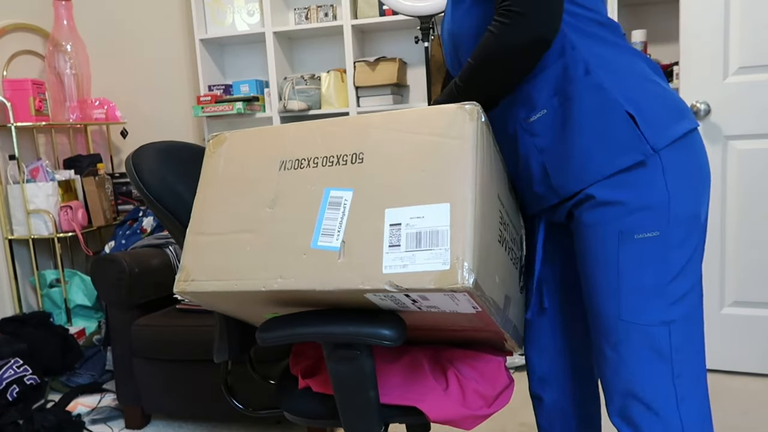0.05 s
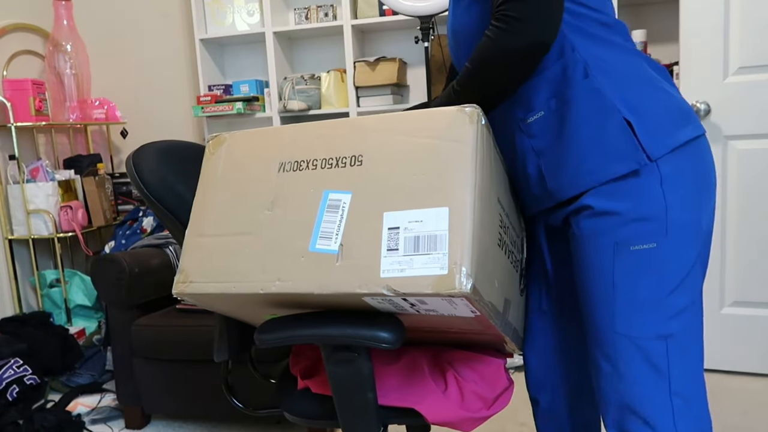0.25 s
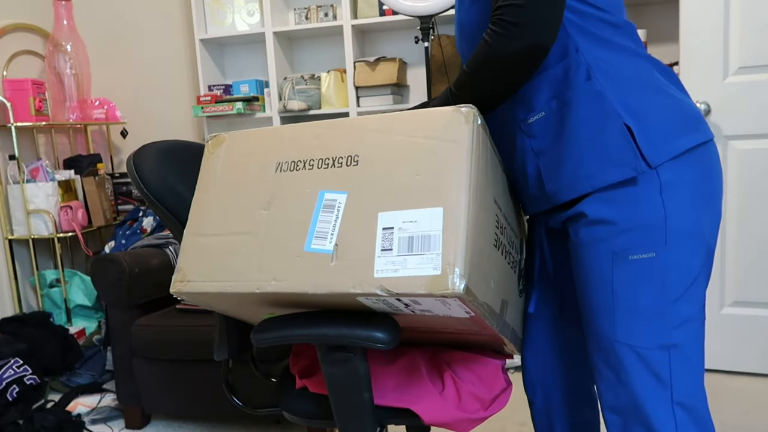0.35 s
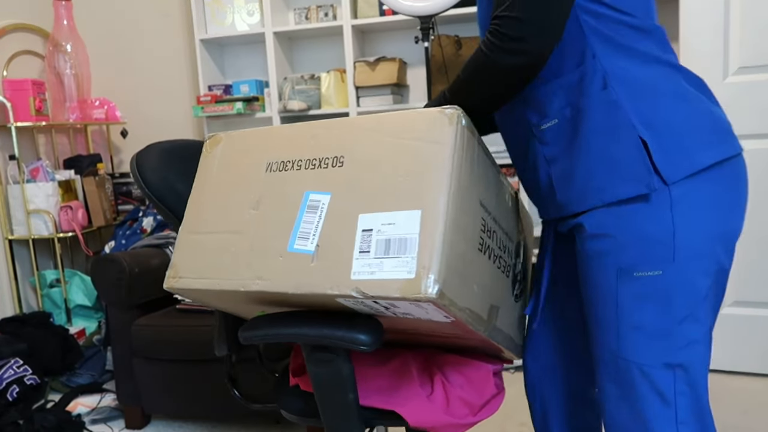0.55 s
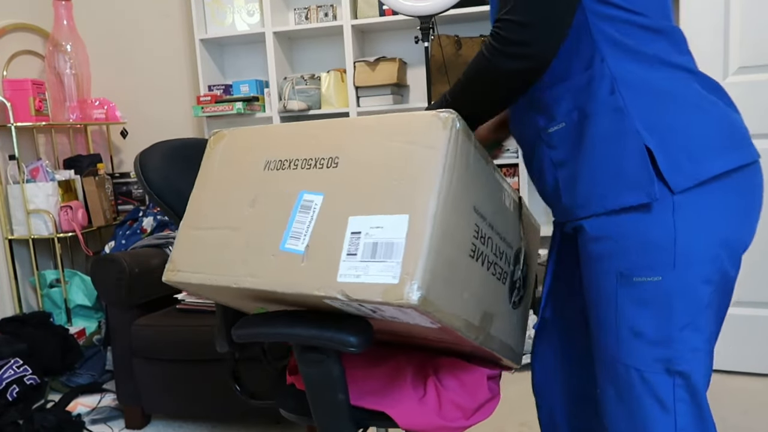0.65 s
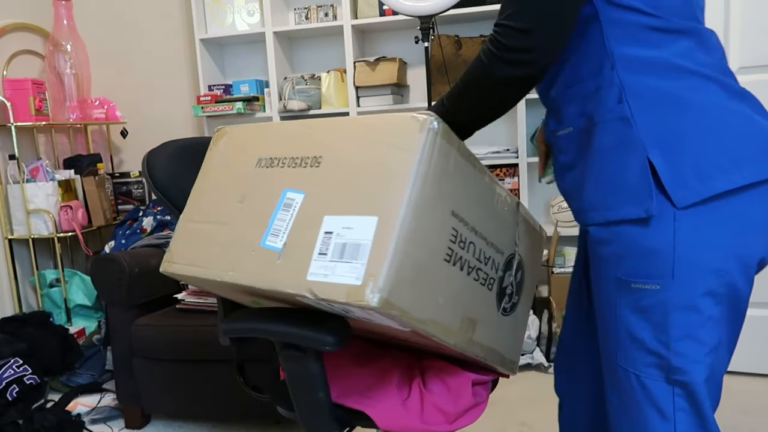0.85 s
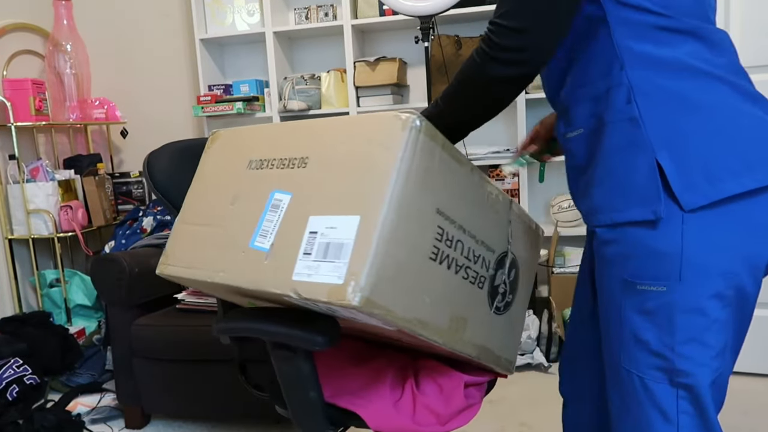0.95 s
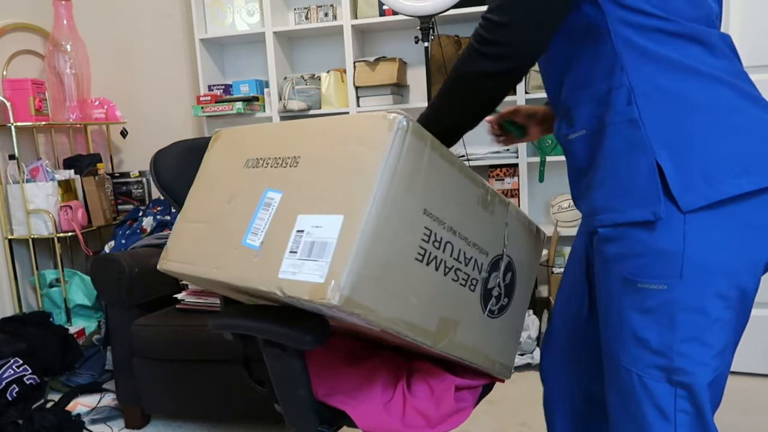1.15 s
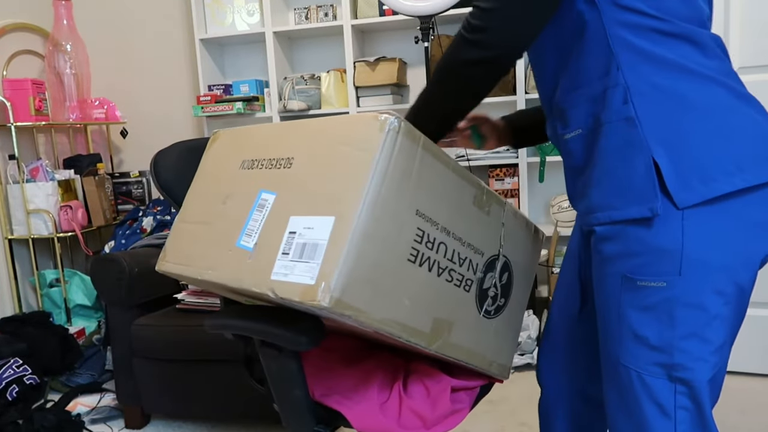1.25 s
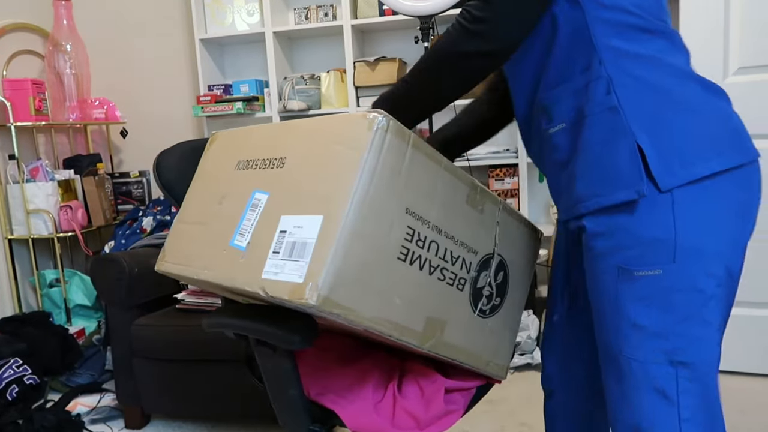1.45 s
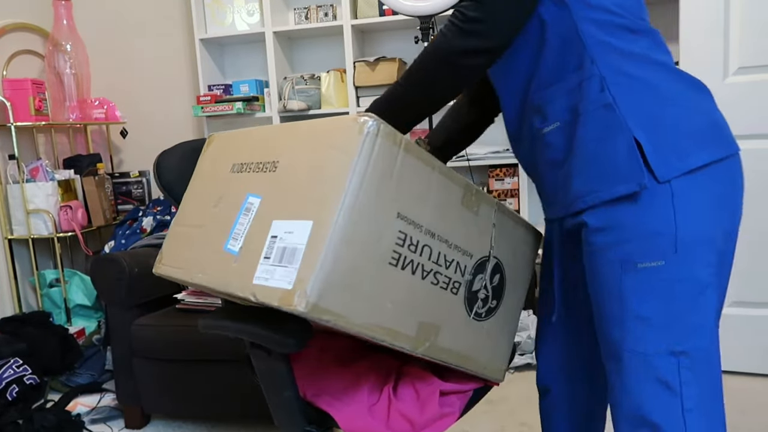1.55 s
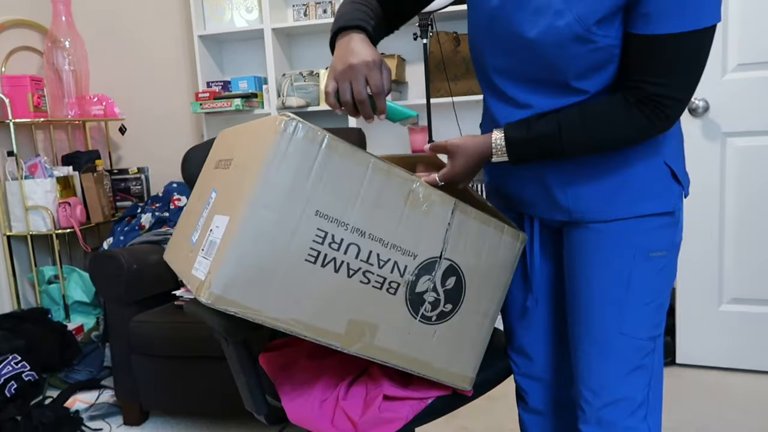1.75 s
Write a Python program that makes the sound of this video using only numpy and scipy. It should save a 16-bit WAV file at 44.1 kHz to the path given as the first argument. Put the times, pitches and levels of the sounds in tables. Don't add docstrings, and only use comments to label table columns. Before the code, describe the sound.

A large hollow cardboard box is handled on a chair, close, in a small room. Faint rubbing opens, then a sharp slap with rattle at 0.23 s and quick knocks near 0.35-0.4. A rough scraping drag with low groans and thuds peaks around 0.65-0.85, fading by 1.0. Quiet shifting and faint brushing follow; after a thud near 1.57 and a brief dip at 1.62, light knocks and ticks end it.

```python
import sys
import numpy as np
from scipy import signal
from scipy.fft import rfft, irfft
from scipy.io import wavfile
from scipy.ndimage import uniform_filter1d

SR = 44100
rng = np.random.default_rng(int(sys.argv[2]) if len(sys.argv) > 2 else 0)


def to_wav(s):
    ch = np.atleast_2d(s).T
    pcm = np.round(np.clip(ch, -1, 1) * 32767)
    wavfile.write(sys.argv[1], SR, pcm.astype(np.int16))


def ratio_of_db(decibels):
    return 10 ** (np.asarray(decibels, float) / 20)


N = 79380
T = np.arange(N) / SR
SLAP_S = 0.2253


def rms_one(x):
    return x / np.sqrt(np.mean(x ** 2) + 1e-20)


def at_hz(points, hz):
    table_hz, table_db = np.array(points)[:, 0], np.array(points)[:, 1]
    return np.interp(np.log(hz), np.log(table_hz), table_db)


def coloured(x, points, turn=1):
    hz = np.maximum(np.fft.rfftfreq(N, 1 / SR), 1)
    return irfft(rfft(x) * turn * ratio_of_db(at_hz(points, hz)), N)


def butter(x, order, hz, kind="low"):
    return signal.sosfilt(signal.butter(order, hz, kind, fs=SR, output="sos"), x)


def drift(rate):
    step = 40
    r = np.exp(-2 * np.pi * rate * step / SR)
    slow = signal.lfilter([1], [1, -2 * r, r * r], rng.standard_normal(N // step + 2002))
    slow = rms_one(slow[2000:])
    return np.interp(np.arange(N) / step, np.arange(len(slow)), slow)


def ring(clicks, hz, t60):
    r, w = ratio_of_db(-60 / (t60 * SR)), 2 * np.pi * hz / SR
    return signal.lfilter([0, np.sin(w)], [1, -2 * r * np.cos(w), r * r], clicks + 1e-18)


def struck(s, db, hz, swell, t60, phase=0, sag=0):
    start = int(s * SR)
    age = T[:min(N - start, int(SR * (t60 + 4 * swell)))]
    shape = (1 - np.exp(-age / swell)) ** 2 * ratio_of_db(-60 * age / t60)
    cycles = hz * age * (1 - sag * np.minimum(age / t60, 1))
    wave = ratio_of_db(db) * shape * np.sin(2 * np.pi * cycles + phase)
    return np.pad(wave, (start, N - start - len(wave)))


def grains(per_s, spread_db):
    sizes = ratio_of_db(spread_db * np.minimum(rng.exponential(1, N), 5.0)) * rng.choice([-1, 1], N)
    return rms_one(sizes * (rng.random(N) < per_s / SR))


def banded(sources, spectrum, motion_db):
    out, rest = 0, 0
    edges = 22 * 2 ** np.arange(0, 9.6, .5)
    for k, (low, high) in enumerate(zip(edges, edges[1:])):
        hz = np.sqrt(low * high)
        pair = butter(sources[k % 2], 2, [low, high], "band") * ratio_of_db(at_hz(spectrum, hz))
        out = out + pair * ratio_of_db(motion_db(hz))
        rest = rest + pair[0]
    return out / np.std(rest)


def rubbing():
    # t/s, speed as hiss level/dB, pressure as drone above hiss level/dB
    rub = [(0, -53, 12.5), (.2, -88, 8), (0.334, -40, -28), (0.392, -38.5, 12), (0.503, -31.5, 3.5),
           (0.564, -28.5, 11.5), (.68, -24, 6), (.77, -24, 7.5), (0.867, -29, 8.5), (0.942, -40.5, -3),
           (0.997, -47.5, -11), (1.2, -51.5, -1), (1.352, -49, -10), (1.498, -55.5, -17),
           (1.565, -47.5, 11.5), (1.7, -53, -6), (1.748, -49, 5), (1.8, -46.5, -1)]
    # f/Hz, level per Hz/dB
    hiss_spectrum = [(40, -38), (120, -10), (350, 0), (900, -4), (2200, -3), (4000, -7.5), (8000, -23),
                     (15000, -44)]
    # f/Hz, level/dB, t60/s
    panels = [(61, -10.5, 0.15), (108, -7.5, 0.25), (165, -5.5, 0.093), (192.6, -3.5, 0.13),
              (260, -3.5, 0.068), (329, 1.5, 0.096), (395, -2.5, .12), (443.4, -11, 0.4), (622, -6, 0.081),
              (689, -8.5, 0.13), (776, -40, 0.086), (930, -12, 0.11), (1450, -20, 0.028), (1964, -9, 0.12)]
    smooth_share = .85
    brighten = 0.078
    s, speed, pressure = np.transpose(rub)
    speed_db, pressure_db = np.interp(T, s, speed), np.interp(T, s, pressure)
    grit = np.sqrt(1 - smooth_share) * grains(1800, 3)
    noise = np.sqrt(smooth_share) * rng.standard_normal((2, 2, N)) + grit
    together = 0.5 * drift(18)

    def motion_db(hz):
        tilt = brighten * (speed_db + 39.5) * np.log2(hz / 2500)
        return speed_db + tilt + together + 1.69 * drift(12.2)

    hiss = banded(noise, hiss_spectrum, motion_db)
    slips = grains(200, 2) + 0.56 * rng.standard_normal(N)
    slips = butter(slips, 2, 1410)
    drone = 0
    for hz, db, t60 in panels:
        velocity = np.diff(ring(slips, hz, t60), prepend=0)
        drone = drone + ratio_of_db(db + 2.16 * drift(14)) * rms_one(velocity)
    return hiss, ratio_of_db(speed_db + pressure_db - 13) * drone


def catches():
    # peak t/s, level/dB, f/Hz
    edge_catches = [(0.351, -43, 4300), (0.401, -44, 695), (0.428, -26.5, 744), (0.453, -29, 995),
                    (0.464, -35, 2200), (0.533, -32, 3596), (0.543, -31, 3036), (0.551, -33.0, 1938),
                    (0.567, -32, 1195), (0.588, -24, 685), (0.596, -27, 973), (0.617, -29, 4060),
                    (0.623, -32, 3639), (0.634, -25, 1415), (0.639, -20, 630), (0.64, -28.5, 4300),
                    (0.665, -27, 2550), (0.665, -18.5, 1007), (0.67, -29.5, 3639), (0.678, -21, 1359),
                    (0.697, -32.9, 4500), (0.73, -21.5, 904), (0.76, -24, 898), (0.784, -26, 689),
                    (0.81, -24.5, 2870), (0.817, -28, 1565), (0.866, -28, 4030), (0.871, -32, 1973),
                    (0.9, -50, 1240), (0.901, -51, 5100), (0.903, -33.5, 3640), (0.904, -35.5, 4260),
                    (0.922, -35, 2370), (0.932, -50, 4694)]
    # peak t/s, level/dB, f/Hz
    fidgets = [(1.083, -46.5, 897), (1.104, -57, 3381), (1.139, -43, 1003), (1.148, -41, 689),
               (1.147, -41, 372), (1.182, -53, 3381), (1.255, -52, 3790), (1.286, -52.0, 3338),
               (1.312, -46.2, 343), (1.313, -49, 2110), (1.318, -53.2, 3360), (1.32, -42, 1468),
               (1.345, -44.5, 350), (1.347, -48, 1570), (1.394, -47.5, 388), (1.556, -55, 3900),
               (1.556, -49, 3330), (1.56, -56.9, 3740), (1.562, -47, 1030), (1.578, -62, 4330),
               (1.578, -49, 3101), (1.582, -50, 3252)]
    swell_s, t60_s = .005, .055
    out = np.zeros(N)
    for rows, gain_db in ((edge_catches, 10), (fidgets, 12.5)):
        for s, db, hz in rows:
            out += struck(s - 2 * swell_s, db + gain_db, hz, swell_s, t60_s)
    return ratio_of_db(2.5 * drift(100)) * out


def thuds():
    # peak t/s, level/dB, f/Hz, swell/s, t60/s
    rows = [(.25, -32.5, 113, 0.011, 0.21), (0.509, -21, 179, 0.015, 0.13),
            (.545, -20.5, 203.6, 0.015, 0.297), (.905, -25, 339, 0.012, 0.134),
            (.585, -21.5, 325, .02, 0.22), (0.623, -33, 111, .015, 0.15), (.64, -26.5, 370.5, 0.016, 0.38),
            (0.664, -25.5, 200, 0.017, 0.19), (.70, -28, 165, 0.0148, 0.16), (1.655, -42, 107, .01, 0.11),
            (0.764, -17, 108, 0.013, 0.24), (0.768, -22.5, 57.3, 0.023, 0.26),
            (0.801, -24, 96, 0.011, 0.11), (.85, -18, 161, 0.0118, 0.13), (.88, -22.5, 260, 0.022, 0.23),
            (0.904, -19.5, 60, 0.014, 0.108), (0.971, -28.5, 191, 0.01235, 0.095),
            (1.352, -42, 107, .01, 0.14), (1.389, -40, 108, 0.011, 0.11), (1.56, -33, 133, 0.0056, 0.08),
            (1.57, -20.5, 60, 0.012, 0.094), (1.69, -37.5, 125, 0.0079, 0.098),
            (0.85, -20, 400, 0.0048, 0.089), (1.661, -37.5, 318, 0.00616, 0.19),
            (.93, -27, 192.3, 0.00953, 0.13)]
    return sum(struck(s - 2 * swell, db + 7.5, hz, swell, t60, sag=0.11)
               for s, db, hz, swell, t60 in rows)


def wall_knocks():
    # t/s, level/dB, pitch factor/1, swell/s, overtone tilt per octave/dB
    rows = [
        (.352, -29.5, 1.25, 0.00075, 6.5),
        (.383, -31, 1.44, 0.0012, 4),
        (.393, -33, 1.57, 0.00082, 6.5),
        (1.127, -34, 1.14, 0.0088, 7),
        (1.265, -47.5, 1.3, 0.0027, -5),
        (1.638, -34.5, 0.95, 0.00023, 4.5),
        (1.651, -33, 1.0, 0.00074, 4.5),
        (1.74, -41, 1.14, 0.002, -3),
        (1.785, -33, 0.93, 0.0085, 4),
    ]
    # f/Hz, level/dB, t60/s
    wall = [(206, -8.5, 0.29), (308.5, 4, 0.12), (400, -7.5, 0.14), (684.6, -6, 0.078), (1054, -12, 0.043),
            (1320, -21, 0.094), (2800, -24.5, 0.051), (3260, -29, 0.058)]
    out = np.zeros(N)
    for s, db, factor, swell, over_db in rows:
        for hz, level_db, t60 in wall:
            chance, phase = rng.standard_normal(2)
            tilt_db = over_db * np.log2(hz / 310)
            soft_db = 9 * np.log2(1 + (hz * swell / 20) ** 4)
            mode_hz = hz * factor if hz < 500 else hz
            out += struck(s, db + level_db + chance + tilt_db - soft_db, mode_hz, swell, t60, phase)
    return out


def slapped_flap():
    # t/s, level/dB
    hits = [
        (.2275, -15),
        (.2306, -16),
        (.241, -37),
        (.262, -27.5),
        (.277, -26),
    ]
    # f/Hz, level/dB, t60/s
    flap = [(294, -23, 0.19), (766, -2.5, 0.083), (1573, -9, 0.076), (1925, 3.5, 0.045), (2250, 0, 0.021),
            (3076, -6, 0.055), (3550, -11, 0.063), (5050, -18, 0.12)]
    out = np.zeros(N)
    for s, db in hits:
        for hz, level_db, t60 in flap:
            chance, phase = rng.standard_normal(2)
            out += struck(s, db + level_db + 1.6 * chance, hz, 0.00047, t60, phase)
    return out


def slap():
    # f/Hz, level per Hz/dB
    spectrum = [(24, -49), (40, -25), (382, -1), (554, -13), (1920, -5), (9360, -17), (10600, -47),
                (13600, -15), (15000, -68)]
    # f/Hz, t60/s
    decay = [(100, 0.39), (500, 0.46), (2000, 0.37), (6000, 0.29), (14000, 0.043)]
    age = np.maximum(T - SLAP_S, 1e-7)

    def shape_db(hz):
        rise_s = 0.0096 + 0.0068 * np.clip(np.log2(hz / 3500), 0, 1)
        rise_db = 40 * np.log10(np.minimum(age / rise_s, 1))
        return rise_db - 60 * age / at_hz(decay, hz) + 0.22 * drift(37)

    return ratio_of_db(-17) * banded(rng.standard_normal((2, 2, N)), spectrum, shape_db)


def ticks():
    # t/s, peak level/dB, f/Hz, t60/s
    rows = [
        (0.1810, -36, 1860, 0.019),
        (0.18, -37, 3160, 0.0055),
        (0.219, -32.5, 1575, 0.021),
        (0.227, -18, 3370, 0.021),
        (1.7336, -26.4, 1170, 0.022),
        (1.7340, -26, 1800, 0.0098),
        (1.7497, -36, 1070, 0.048),
        (1.769, -28.5, 4060, 0.0071),
    ]
    out = np.zeros(N)
    for s, db, hz, t60 in rows:
        click = np.zeros(N)
        start = int(s * SR)
        click[start:start + 5] = ratio_of_db(db - 12) * np.hanning(7)[1:-1]
        out += ring(click, hz, t60)
        out += 0.12 * ring(click, hz * 1.3, t60)
        out += 0.26 * ring(click, hz * 1.55, t60 * 1.4)
    return out


def brush():
    # f/Hz, level/dB, t60/s
    modes = [(1475, -2.5, 0.017), (1720, -6.5, 0.013), (2380, 0.5, 0.0082), (3320, -5, 0.029)]
    air = rng.standard_normal(N)
    stroke = ratio_of_db(-51) * np.exp(-((T - 1.408) / 0.15) ** 2)
    return stroke * sum(ratio_of_db(db + 3.2 * drift(5.0)) * rms_one(ring(air, hz, t60)) for hz, db, t60 in modes)


def room(x):
    t60_s, wall_cut_hz = 0.38, 6000
    out, dull = np.zeros(N), np.exp(-2 * np.pi * wall_cut_hz / SR)
    lags = (rng.uniform(.01, .03, size=8) * SR).astype(int)
    for k, lag in enumerate(lags):
        loop, gain, state = x.copy(), ratio_of_db(-60 * lag / SR / t60_s), [0.]
        for i in range(lag, N, lag):
            back, state = signal.lfilter([gain * (1 - dull)], [1, -dull], loop[i - lag:i], zi=state)
            loop[i:i + lag] += back[:N - i]
        out += (loop - x) * (-1) ** k
    return out


def room_tone():
    # f/Hz, level per Hz/dB
    spectrum = [(30, -6.5), (60, -0.5), (200, -8.5), (360, -4.5), (520, -19), (1670, -13), (3300, -21.5),
                (13500, -42.5)]
    return ratio_of_db(-52) * banded(rng.standard_normal((2, 2, N)), spectrum, lambda hz: 1.5 * drift(5))


def patchy_treble(x):
    flicker_hz, patch_hz = 8600, 350
    hz, whole = np.fft.rfftfreq(N, 1 / SR), rfft(x)

    def below(edge_hz):
        return irfft(whole * np.clip((edge_hz - hz) / 300 + .5, 0, 1), N)

    out = below(flicker_hz)
    for k in range(19):
        low = flicker_hz + k * patch_hz
        threshold = .45 * min(k / 3 - 1, 1) + max(k - 12, 0) / 2
        off_slap = np.abs(T - SLAP_S) > .088 - k * .0034
        shut = uniform_filter1d(1. * (drift(6) < threshold) * off_slap, size=600)
        out += (below(low + patch_hz) - below(low)) * ratio_of_db(4 - 26 * shut)
    return out


def flares():
    # t/s, half length/s, level/dB
    rows = [
        (.805, .024, -58),
        (.897, .043, -52),
    ]
    bright = butter(rng.standard_normal(N), 6, 12300, "high")
    envelope = sum(ratio_of_db(db) * np.exp(-((T - s) / length) ** 6) for s, length, db in rows)
    return envelope * ratio_of_db(5.4 * drift(30)) * rms_one(bright)


def whine(masker):
    tone = ratio_of_db(-70) * rms_one(ring(rng.standard_normal(N), 13000, 0.091))
    return tone / (1 + uniform_filter1d(masker ** 2, size=2000) / ratio_of_db(2 * -42))


def port_difference(x):
    # f/Hz, level/dB
    difference = [(60, -92), (400, -23), (800, -27), (1200, -48), (3000, -40), (3500, -8.5), (8000, 2),
                  (14000, 14)]
    # f/Hz, level per Hz/dB
    self_noise = [(25, -36), (237, -7), (500, -12.5), (1200, -24), (1900, -44), (3200, -54), (3800, -31),
                  (15000, -64)]
    noise = ratio_of_db(-56) * rms_one(coloured(rng.standard_normal(N), self_noise))
    wide_s = 0.032
    crack = ratio_of_db(-20.5) * np.exp(-((T - SLAP_S - wide_s) / wide_s) ** 2) * x
    return coloured(x, difference, turn=1j) + noise + crack


def scene():
    hiss, drone = rubbing()
    box = drone + catches() + thuds() + wall_knocks() + slapped_flap() + ticks() + brush()
    box = butter(box + ratio_of_db(-21.5) * room(box), 3, 65, "high")
    pair = hiss + slap() + room_tone() + box
    mid = patchy_treble(pair[0])
    mid = mid + flares() + whine(mid)
    side = port_difference(pair[1])
    return np.array([mid + side, mid - side])


def low_pass(x):
    return signal.sosfilt(signal.butter(12, 15410, fs=SR, output="sos"), x)


def record(dry):
    limit, dip_s = .7, 1.62
    fade_out, fade_in = (dip_s - T) / 0.028, (T - dip_s) / 0.016
    fade = np.clip(np.maximum(fade_out, fade_in), ratio_of_db(-24), 1)
    soft = butter(limit * np.tanh(dry / limit), 10, 15100)
    return low_pass(soft * fade)


dry = scene()
out = record(dry)
to_wav(out)
```